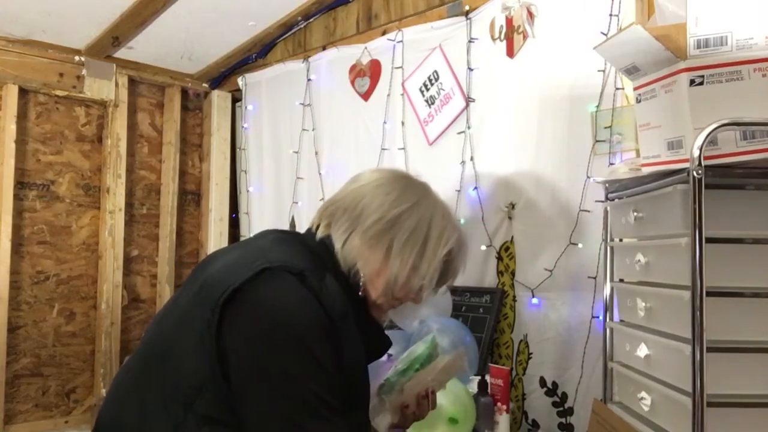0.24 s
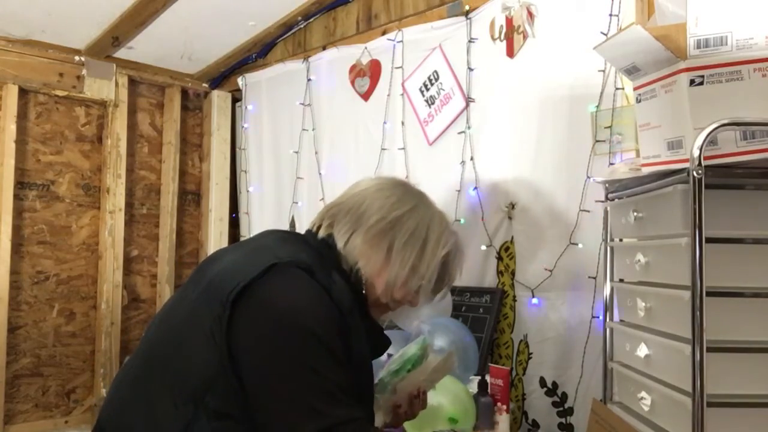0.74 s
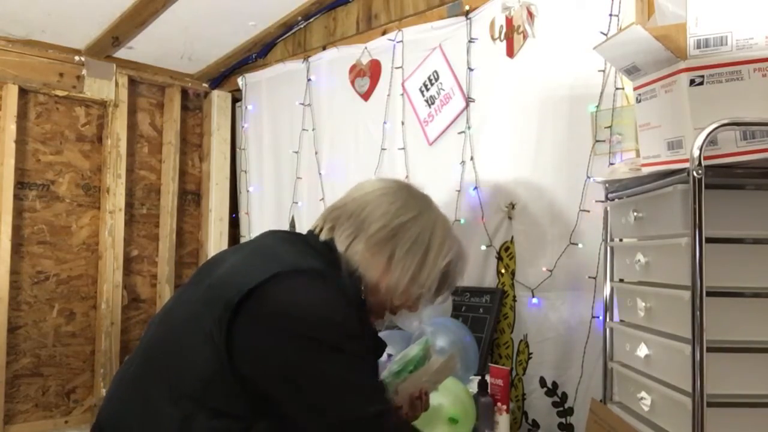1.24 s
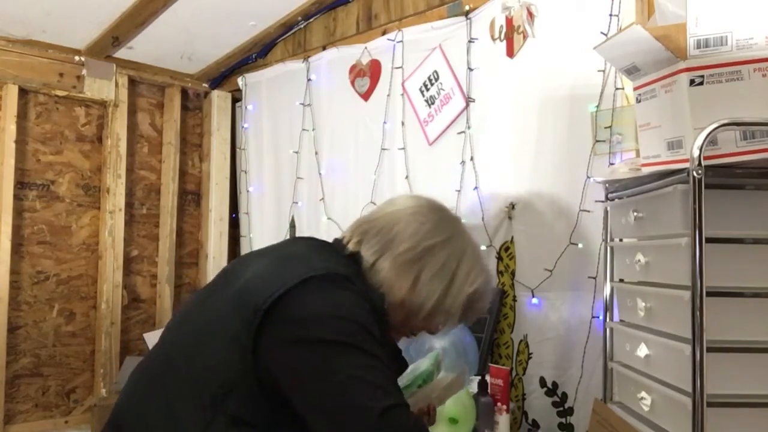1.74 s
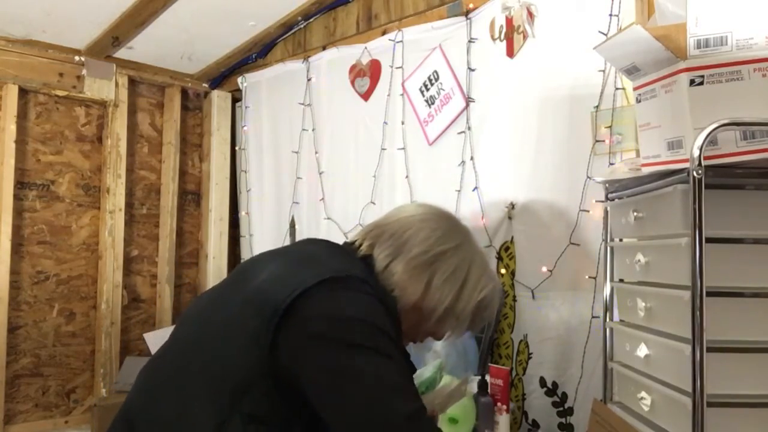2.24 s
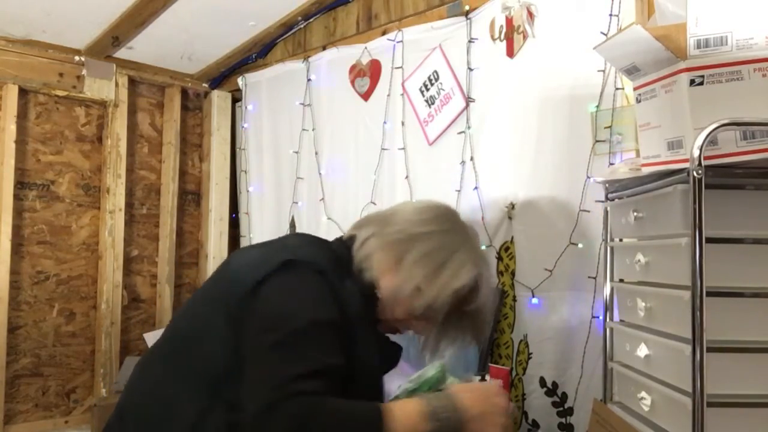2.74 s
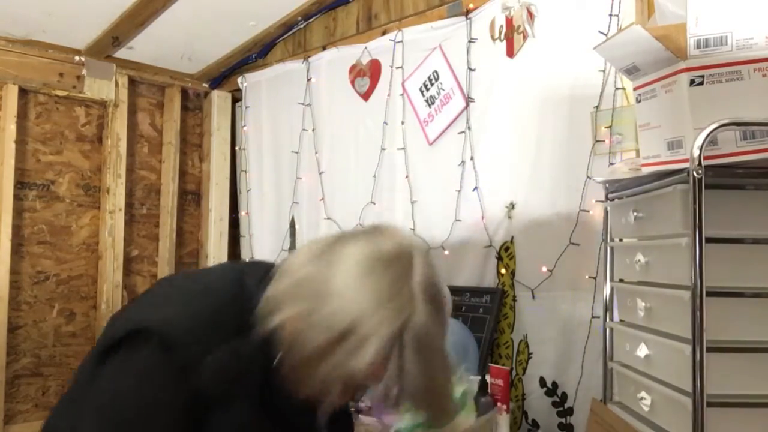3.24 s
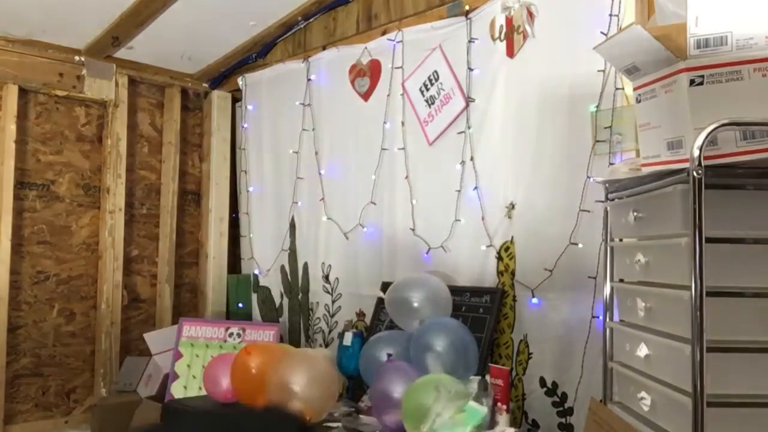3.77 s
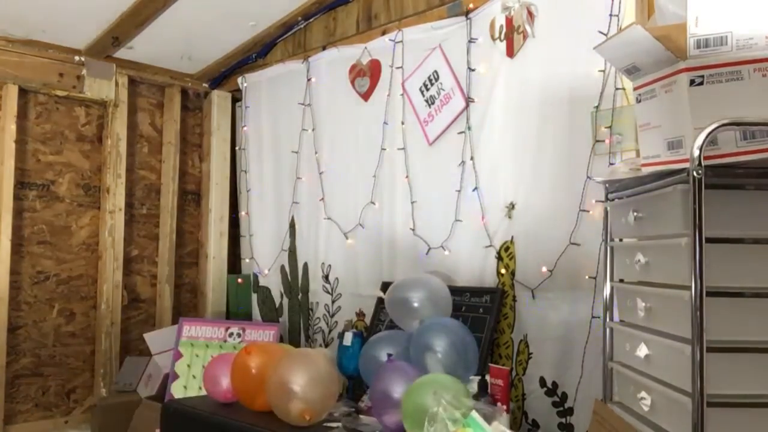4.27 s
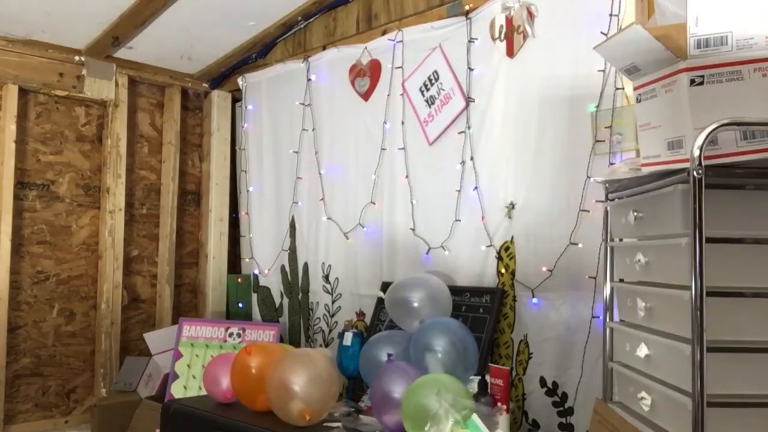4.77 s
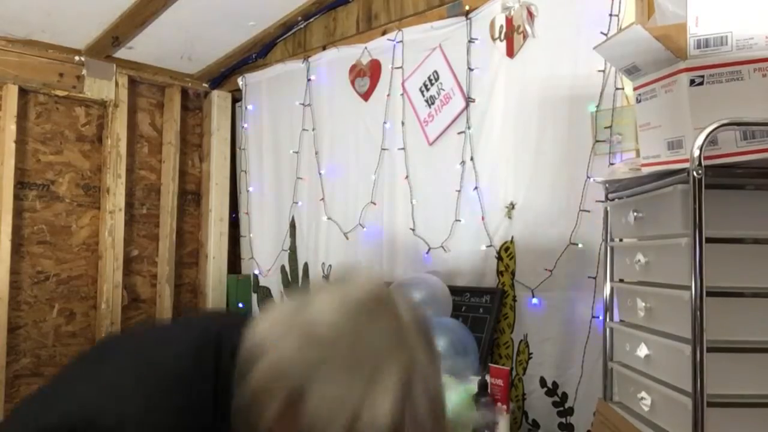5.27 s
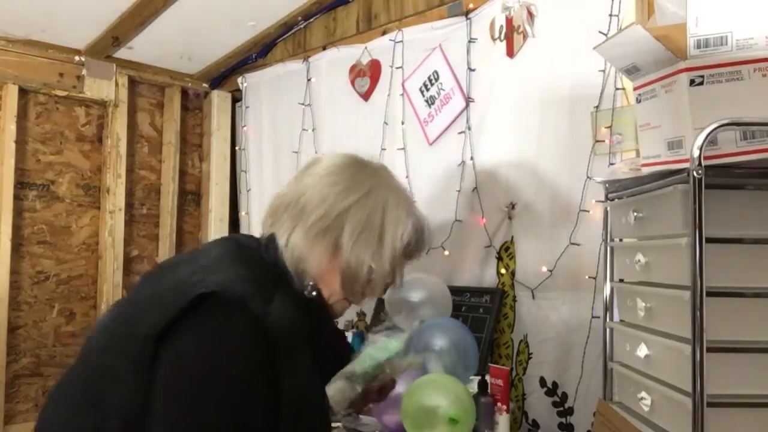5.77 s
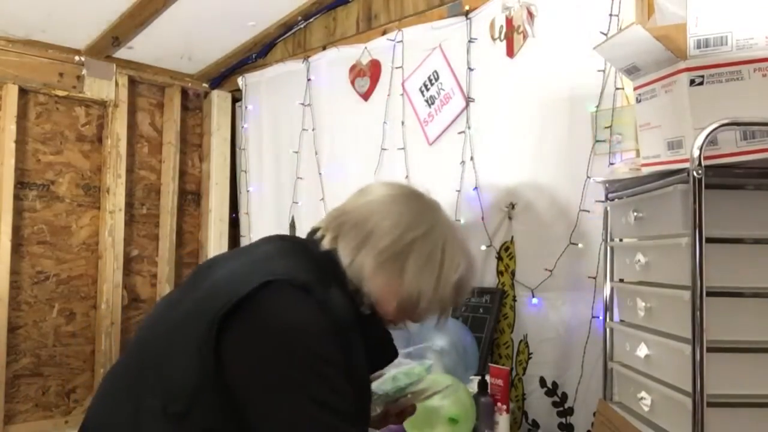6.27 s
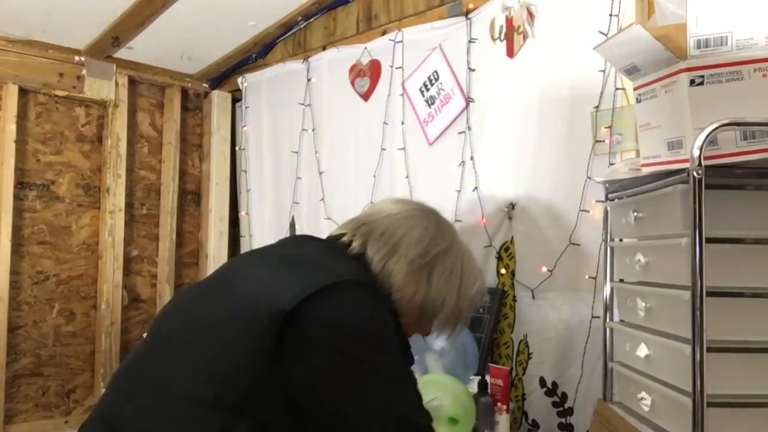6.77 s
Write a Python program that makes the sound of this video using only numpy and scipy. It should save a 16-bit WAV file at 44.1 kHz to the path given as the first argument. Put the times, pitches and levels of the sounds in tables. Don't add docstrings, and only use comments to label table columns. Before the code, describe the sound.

Hands rummage through thin plastic bags filled with small hard trinkets. Crisp crackles come in uneven bursts, densest around two seconds and again just after six, with a very sharp snap near 2.6. Pieces click and slump inside, while bags and boxes thump and pat a hollow table. A small wooden shed adds a short tail; the nearby microphone sounds bright and treble-heavy.

```python
import sys
import numpy as np
from scipy import signal
from scipy.fft import rfft, irfft
from scipy.io import wavfile

SR = 44100
rng = np.random.default_rng(int(sys.argv[2]) if len(sys.argv) > 2 else 0)


def store_wav(level_fs):
    pcm = np.round(np.clip(np.atleast_2d(level_fs), -1, 1) * 32767)
    wavfile.write(sys.argv[1], SR, pcm.T.astype(np.int16))


def boost(x):
    u = np.asarray(x, float) / 20
    return 10 ** u


N = 309141

# start in seconds, closing time in seconds, holding time in seconds, film crackle in dB.
GRABS = [(0.0, 0.0039, 0.019, -52), (0.17, 0.073, 0.036, -43.5), (0.29, 0.063, 0.009, -37.5),
         (0.753, 0.007, 0.019, -49.5), (1.211, 0.0483, 0.186, -42), (1.44, 0.0784, 0.0622, -35),
         (1.62, 0.038, 0.053, -42), (1.76, 0.108, 0.21, -46.5), (1.95, 0.082, 0.1, -41),
         (2.14, 0.0367, 0.0113, -34), (2.22, 0.072, 0.072, -38), (3.25, 0.011, 0.13, -60),
         (2.618, 0.023, 0.013, -36), (2.838, 0.0044, 0.0904, -39.5), (3.049, 0.057, 0.012, -39),
         (3.43, 0.1134, 0.65, -55), (3.86, 0.031, 0.186, -47), (4.049, 0.026, 0.22, -47),
         (4.265, 0.0452, 0.164, -40), (4.432, 0.0505, 0.046, -41), (4.56, 0.0286, 0.091, -46.5),
         (4.64, 0.133, 0.064, -46.5), (4.87, 0.0095, 0.36, -54), (5.463, 0.023, 0.039, -38.5),
         (5.629, 0.016, 0.128, -49), (5.862, 0.046, 0.23, -40), (5.97, 0.0216, .4, -38),
         (6.338, 0.0128, 0.134, -44.5), (6.753, 0.0054, 0.0582, -38.5), (6.85, 0.039, .2, -38),
         (0.42, 0.018, 0.036, -77), (0.56, .03, 0.14, -65), (0.9, 0.024, 0.0254, -60),
         (1.08, 0.059, .08, -73), (2.47, 0.0095, 0.097, -51.5), (5.2, 0.058, 0.153, -61.5),
         (6.04, 0.014, 0.0088, -50), (6.15, 0.016, 0.043, -37), (6.238, 0.025, 0.027, -31),
         (6.4, 0.0081, 0.064, -38), (6.52, 0.025, 0.021, -51), (3.98, 0.068, 0.067, -47.5)]
# time in seconds, change of rumble in dB.
LEAN = [(0, 5.5), (.45, 1.5), (.9, 3.5), (1.3, 7), (1.6, 8.5), (2.0, 5), (2.35, -3), (2.7, 2.5),
        (3.35, 5.5), (3.66, 6.5), (3.76, 16.5), (4.3, 6.5), (4.5, -3.5), (4.62, -5.5), (4.85, 1), (5.25, 6),
        (5.9, -0.5), (6.45, -1.5), (6.7, 5.5)]
# time in
# seconds, peak in dB.
SNAPS = [(0.0186, -23.2), (0.0363, -23.1), (0.099, -13.3), (0.1199, -19.9), (0.1786, -20.0),
         (0.1842, -15.8), (0.2091, -19.3), (0.249, -8.2), (0.2541, -9.5), (0.5001, -18.5), (0.5054, -22.2),
         (1.3106, -11.8), (1.3205, -11.6), (1.5026, -12.8), (1.5256, -12.7), (1.5466, -10.5),
         (1.5514, -11.4), (1.5745, -12.8), (1.6244, -14.6), (1.8289, -14.9), (1.8845, -14.3),
         (1.8896, -15.9), (1.9333, -10.5), (1.9392, -16.0), (2.0284, -13.5), (2.0455, -9.8),
         (2.0518, -12.5), (2.0577, -14.4), (2.1187, -12.0), (2.1241, -16.3), (2.1718, -13.4),
         (2.1818, -11.2), (2.1873, -13.1), (2.2173, -11.0), (2.2482, -15.0), (2.2946, -14.7),
         (2.3221, -10.1), (2.3293, -15.0), (2.3602, -13.0), (2.3651, -4.0), (2.3809, -15.6),
         (2.3858, -14.3), (2.4032, -12.2), (2.4544, -16.8), (2.4598, -15.7), (2.6117, -8.0), (2.6181, -1.2),
         (2.6218, -6.0), (2.8384, -20.5), (2.8412, -9.1), (2.8474, -11.4), (2.8536, -11.6), (3.5523, -23.3),
         (3.7495, -21.7), (3.8258, -23.7), (3.8401, -22.4), (3.8721, -22.8), (3.8792, -22.1),
         (3.8924, -17.6),
         (4.1978, -18.1), (4.4565, -12.1), (4.4611, -12.6), (4.6184, -15.1), (4.6266, -14.5),
         (4.7331, -14.8), (4.895, -16.5), (5.0975, -24.2), (5.1467, -26.6), (5.4715, -7.8), (5.4772, -17.2),
         (5.4917, -14.6), (5.5432, -14.9), (5.5501, -13.2), (5.6848, -14.5), (5.6919, -11.8),
         (5.6973, -11.9), (5.867, -18.1), (5.9215, -8.4), (5.9269, -11.5), (5.9906, -14.9), (6.0032, -11.4),
         (6.0645, -10.8), (6.0698, -8.1), (6.0723, -12.0), (6.09, -5.2), (6.0953, -9.3), (6.1168, -12.5),
         (6.1284, -12.4), (6.1632, -7.3), (6.1684, -9.4), (6.1745, -9.7), (6.1836, -12.2), (6.2063, -9.9),
         (6.2113, -9.1), (6.2152, -12.4), (6.2398, -8.7), (6.2449, -11.5), (6.2531, -11.5), (6.2584, -10.1),
         (6.2758, -8.6), (6.281, -9.2), (6.2843, -8.9), (6.2897, -9.4), (6.2937, -11.5), (6.3834, -12.8),
         (6.3887, -13.7), (6.4092, -13.6), (6.4446, -12.9), (6.574, -20.8), (6.7621, -16.7),
         (6.7663, -14.3), (6.7741, -13.3), (6.8042, -13.8), (6.9195, -10.8), (6.9639, -15.8),
         (6.9731, -11.9), (7.0012, -11.8), (7.0069, -12.9),
         (0.0401, -23.7), (0.0939, -24.3), (0.1135, -20.7), (0.2158, -21.9), (0.2236, -23.8),
            (0.5557, -28.2), (0.5612, -34.0), (0.6463, -40.7), (0.803, -22.8), (0.8964, -26.5),
            (1.1674, -42.7), (1.8246, -23.0), (1.875, -18.8), (1.9779, -18.6), (2.0128, -17.4),
            (2.317, -16.3), (2.3396, -16.0), (2.5528, -24.6), (2.5782, -25.8), (3.4936, -29.9),
            (3.586, -27.3), (3.8793, -21.6), (3.9571, -21.1), (3.9663, -20.8), (4.2301, -18.5),
            (4.2956, -19.6), (4.3959, -17.6), (4.5691, -19.0), (4.6116, -18.6), (4.6729, -18.2),
            (4.7192, -18.5), (4.8889, -20.9), (4.9772, -30.1), (5.2913, -34.4), (5.5243, -15.9),
            (5.5707, -15.1), (5.702, -16.2), (5.785, -23.7), (5.8618, -25.6), (6.0766, -13.8),
            (6.5489, -23.6), (6.5539, -25.0), (6.5688, -21.6), (6.5895, -22.5), (6.6036, -21.8),
            (6.6091, -24.1), (6.7978, -15.3), (6.8432, -18.4)]
# time in seconds, peak in dB, rattle centre in Hz, rattle treble in dB re peak.
KNOCKS = [(0.071, -41, 1100, 6.5), (0.0986, -56.5, 5060, 32.5), (0.177, -38, 2850, 18),
          (0.232, -43, 5150, 24), (0.2887, -31, 5790, 11.5), (0.5, -55.5, 5760, 26.5),
          (0.764, -51.5, 2780, 22), (1.216, -32, 810, 4.5), (1.343, -21.5, 1000, 3.5),
          (1.8223, -40.5, 5970, 9), (2.0474, -31.5, 3000, 16), (2.058, -28.5, 1166, -10),
          (2.17, -16.5, 2610, -4), (2.359, -56.5, 5700, 14), (2.6105, -23, 2800, 18.5),
          (2.616, -17, 2900, 7.5), (2.7165, -28.5, 5300, -1.5), (2.846, -30.5, 2370, 18),
          (2.8947, -21.5, 5480, 5.5), (2.9713, -31.5, 2200, -14), (3.414, -36.5, 1820, 4.5),
          (3.8923, -20, 1850, -15), (4.19, -32, 4500, 12.5), (4.159, -31.5, 4000, -5),
          (4.887, -40.5, 1780, 11), (5.1067, -40.5, 1990, 2), (5.4726, -31.5, 4520, 9.5),
          (5.547, -27, 3500, 12.5), (5.685, -28.5, 3120, 12.5), (5.862, -41.5, 2300, 14.5),
          (5.9192, -34, 2870, 1), (6.764, -31, 3570, 14), (3.966, -30, 735, -35.5),
          (6.408, -30.5, 4000, 10)]
# time in seconds, peak in dB, rattle centre in Hz, rattle treble in dB re peak.
SLUMPS = [(0.1044, -39.5, 4920, 9), (0.3494, -51.5, 2820, 4), (0.8644, -52, 3100, 21.5),
          (0.895, -52, 3180, 23.5), (1.2844, -41, 4360, 23.5), (1.3125, -24, 4900, 8.5),
          (1.3994, -32.5, 1770, 10.5), (1.5199, -39, 4990, 1), (1.6194, -34.5, 1020, 15),
          (1.8714, -31, 5470, 11.5), (1.9744, -35.5, 3160, 15.5), (2.8444, -34, 2500, -1),
          (2.954, -29.5, 2680, 6.5), (3.047, -30, 1210, 7.5), (3.0974, -24, 2790, 8.5),
          (3.196, -30.5, 2490, 10), (3.4244, -31.5, 1550, -7), (3.925, -26.5, 1110, -5),
          (4.0774, -25.5, 5600, 7.5), (4.3344, -29, 4340, 4.5), (4.4504, -23, 2870, 9),
          (4.5044, -28.5, 6050, -38.5), (4.606, -46.5, 4960, 30), (4.666, -34.5, 6800, 18),
          (4.713, -29.5, 4010, 14), (5.497, -29.5, 4400, -6), (5.6421, -29, 5200, 2.5),
          (6.0544, -26.5, 6100, -10), (6.263, -40, 5200, 10), (6.575, -31, 4010, 4),
          (3.465, -39.5, 1000, 1), (3.96, -30, 800, -20), (4.1, -39, 1920, -6), (4.09, -32.5, 980, -8.5),
          (6.87, -29, 1300, -1.5), (2.67, -29, 2760, -4), (4.41, -41.5, 5000, 21), (6.198, -38, 5000, 22),
          (6.375, -46.5, 5000, 9.5), (1.6, -35.5, 5000, 15), (4.79, -47, 5000, 24), (2.92, -38, 5500, 6),
          (5.99, -33, 3500, 3)]
# frequency in Hz, level in dB, T60 in seconds.
PIECE_MODES = [(724, -7.5, 0.16), (1120, -9, 0.05), (1420, -5, 0.07), (1620, -4, 0.04), (1850, -8, .04),
               (2270, -24, 0.071), (2420, 3, 0.035), (2876, 0, 0.03), (3180, 4, 0.06), (4560, -9, 0.046),
               (5150, 1, 0.03), (5950, -5, 0.04)]
# time in seconds, peak in dB, then middle modes, upper modes and floor boom in dB re peak.
THUMPS = [(0.155, -70, 12, 22, -20), (0.24, -68, 16.5, 10, -12), (0.765, -66, 8, 8, -20),
          (1.211, -50, 12, 21, -24), (1.2172, -20, -13, -22, -34), (1.2466, -28, -22, -30, -40),
          (1.338, -28, -7, -10, -26), (1.375, -32, -10, -20, -26), (1.44, -52, 8, -5, -20),
          (1.635, -56, 14, -5, -20), (2.167, -34, 0, 0, -21), (2.418, -50, 7, 5, -14),
          (2.615, -34, -15, -20, -14), (2.91, -42, -12, -16, 7), (3.143, -37, -29, -29, 0),
          (3.229, -62.5, -14, -14, 29), (3.425, -66, 25, 22, -20), (3.438, -74, 36, 39, -22),
          (3.47, -70, 28, 22, -20), (3.597, -56, 10, 8, -30), (3.703, -52, 5, -10, -11),
          (3.902, -31, -14, -20, -26), (4.028, -36, -4, -14, -26), (4.085, -55, 14, 5, -20),
          (4.253, -44, -9, -9, -14), (4.33, -48, -10, -20, -14), (4.468, -45, -24, -24, -1),
          (5.477, -46.5, -5, -5, -26), (5.56, -49, -15, -15, -20), (5.878, -53.5, -2, -2, 10),
          (5.994, -42.5, -5, -5, -22), (6.305, -32, -8, -20, -16), (6.342, -35, -12, -25, -16),
          (6.436, -31, -4, -16, 2), (6.447, -33, -15, -15, 11.5), (6.471, -51, -14, -14, 24),
          (6.598, -56, -12, -16, 19), (6.764, -50, 13, 6, -18), (6.774, -33, 0, -14, -18),
          (6.888, -38, -20, -25, -30)]
# frequency in Hz, level in dB, T60 in seconds.
TABLE_LOW = [(136, 0, 0.22), (195, -13, 0.3), (250, -12, 0.12)]
# frequency in Hz, level in dB, T60 in seconds.
TABLE_MIDDLE = [(317, -1, 0.096), (372, 2.5, 0.13), (413, 3.5, 0.07)]
# frequency in Hz, level in dB, T60 in seconds.
TABLE_UPPER = [(481, -35.5, 0.044), (628.6, -0.5, 0.075), (770, -1.5, 0.11), (1000, 2, 0.08)]
# frequency in Hz, level in dB, T60 in seconds.
FLOOR_BOOM = [(49, 0, .24), (78, 0, .18)]
# time in seconds, peak in dB, frequency in Hz.
PATS = [(1.255, -32, 228), (1.357, -43, 77), (1.367, -42, 226), (1.378, -41.5, 87), (1.386, -37, 230),
        (1.388, -41, 390), (1.442, -43, 350), (2.177, -42, 365), (2.212, -43, 129.6), (2.62, -39.5, 201),
        (2.632, -42.5, 132.5), (3.138, -45, 240.5), (3.21, -45, 216), (3.231, -50.5, 66.7),
        (3.71, -45, 237), (3.733, -48, 237.4), (3.906, -47.5, 372), (3.951, -41, 364.7), (3.985, -55, 135),
        (4.032, -46, 342.5), (4.032, -42, 225), (4.113, -41, 257), (6.291, -39, 379), (6.316, -43, 337),
        (6.316, -40, 231), (6.391, -40, 127), (6.425, -41.5, 127), (6.448, -34, 215), (6.45, -35.5, 80.6),
        (6.464, -42, 340), (6.477, -39.5, 212), (6.489, -41, 145), (6.514, -46, 58.3), (6.522, -45, 198.6),
        (6.553, -48.5, 65), (6.786, -36.5, 144.2), (6.795, -47.5, 75), (6.855, -40.5, 372),
        (6.875, -44, 235), (6.879, -42.5, 389), (6.928, -46, 133), (6.945, -45, 384)]
# time in seconds, level in dB, frequency in Hz, T60 in seconds.
SQUEAK = [
    (1.883, -30, 9950, .04),
]
# time in seconds, frequency in Hz, level in dB.
SLIDE = [
    (3.72, 173.9, -55),
    (3.76, 173.8, -43.5),
    (3.802, 186.6, -64),
    (3.86, 188.2, -56.5),
    (3.91, 199.8, -47),
    (3.97, 211.1, -48),
    (4.03, 189.7, -53),
]
# frequency in Hz, level in dB per Hz.
TREBLE_COLOUR = [(3000, -45), (5000, -17), (7600, -15), (8800, -5), (10100, -6), (11000, 1), (11800, 0),
                 (13500, -9), (14600, -16), (16000, -24)]
# frequency in Hz, level in dB per Hz.
BODY_COLOUR = [(290, -13.5), (500, -6.5), (602, -6.5), (823, -4.5), (1790, -1), (2310, -0.5), (4690, -4),
               (8000, -14.5), (10400, -15), (17600, -120)]
# frequency in Hz, level in dB per Hz.
RUMBLE_COLOUR = [(15, -71), (25, -46.5), (75, -9), (96, -11.5), (117, -9.5), (135, 4.5), (156, -1),
                 (200, -1), (280, -3.5), (330, -2), (370, 0), (420, -6), (520, -8.5), (900, -15.5),
                 (1980, -55.5)]
# frequency in Hz, level in dB per Hz.
AIR_COLOUR = [(25, -26.5), (60, 19), (138, 14.5), (368, -47), (520, -11), (1100, 8.5), (7100, -20.5),
              (11300, 1.5), (14600, -40), (16000, -29)]

CLOSING_DB, RELEASE_DB_PER_S, REST_DB = 19, 131.5, -78
SETTLE_DB, SETTLE_DB_PER_S = -26, 36.5
BODY_DB, BODY_PER_DB = -2, -0.1971
RUB_DB, RUB_PER_DB = -62.5, 0.59
WAKE_DB, WAKE_DB_PER_S = -14, 168
STRAYS_PER_S, STRAY_DB, STRAY_SPREAD_DB = 3, 4, 3
KNOCK_RISE_S, KNOCK_T60_S = .0025, 0.13
SLUMP_RISE_S, SLUMP_T60_S = .014, 0.13
PAT_RISE_CYCLES, PAT_T60_CYCLES = 1.5, 14
SHED_T60_S, SHED_DB = 0.22, -11.5
AIR_DB = -68.5
CUTOFF_HZ, BASS_CUT_HZ = 16050, 44


def rms_one(x):
    return x / np.sqrt(np.mean(x ** 2) + 1e-20)


def in_time(rows):
    s, *columns = np.transpose(rows)
    return [np.interp(np.arange(N) / SR, s, c) for c in columns]


def colour(x, spectrum):
    size = 8192
    hz = np.maximum(np.arange(size // 2 + 1) * SR / size, 1)
    point_hz, point_db = np.transpose(spectrum)
    gain_db = np.interp(np.log(hz), np.log(point_hz), point_db)
    cepstrum = irfft(np.log(boost(gain_db)))
    cepstrum[1:size // 2] *= 2
    cepstrum[size // 2 + 1:] = 0
    pulse = irfft(np.exp(rfft(cepstrum)))
    return signal.fftconvolve(x, pulse / np.sqrt(np.sum(pulse ** 2)))[:N]


def drift(rate):
    r = np.exp(-80 * np.pi * rate / SR)
    noise = rng.standard_normal(N // 40 + 2002)
    slow = signal.lfilter([1], [1, -2 * r, r * r], noise)[2000:]
    return np.interp(np.arange(N) / 40, np.arange(len(slow)), rms_one(slow))


def ring(clicks, hz, t60):
    r, w = boost(-60 / (t60 * SR)), 2 * np.pi * hz / SR
    return signal.lfilter([0, np.sin(w)], [1, -2 * r * np.cos(w), r * r], clicks + 1e-18)


def clicks_at(s, db):
    out = np.zeros(N)
    index = np.round(np.asarray(s) * SR).astype(int)
    out[np.minimum(index, N - 1)] = boost(db)
    return out


def creases(per_s, spread_db, length_s):
    clumping = boost(4.0 * np.minimum(drift(25), 1))
    born = rng.random(N) < per_s * clumping / SR
    sizes = boost(spread_db * np.minimum(rng.exponential(1, N), 2.8))
    r = np.exp(-1 / (length_s * SR))
    region = rng.integers(0, 6, N)
    out = np.zeros(N)
    for k, hz in enumerate(np.geomspace(1500, 13000, 6)):
        bursts = signal.lfilter([1], [1, -r], born * sizes * (region == k) + 1e-18)
        puffs = bursts * rng.standard_normal(N)
        band = signal.butter(1, [hz / 2.07, hz * 1.64], "band", fs=SR)
        out += .5 * puffs + signal.lfilter(*band, puffs)
    return rms_one(out)


def fading(rise_db):
    total_db = 10 * np.log10(np.sum(boost(rise_db) ** 2, axis=0) + 1e-20)
    return np.interp(np.arange(N) / SR, np.arange(len(total_db)) / 1000, total_db)


def hand():
    t = np.arange(N * 1000 // SR + 2) / 1000
    s, closing, holding, level_db = np.transpose(GRABS)[:, :, None]
    closing = np.maximum(closing, .005)
    since_release = t - s - closing - holding
    swell_db = -CLOSING_DB * np.maximum(1 - (t - s) / closing, 0)
    grabs = level_db + swell_db - RELEASE_DB_PER_S * np.maximum(since_release, 0)
    creep_db = level_db + SETTLE_DB - SETTLE_DB_PER_S * since_release
    creep = np.where(t > s + closing, creep_db, -200)
    crackle_db = fading(np.vstack([grabs, creep, REST_DB + 0 * t]))

    s, peak_db, middle_db = np.transpose(THUMPS)[:3, :, None]
    wake = peak_db + np.maximum(middle_db, -9) + WAKE_DB - WAKE_DB_PER_S * (t - s)
    wake_db = fading(np.where(t > s, wake, -200))

    effort_db = crackle_db + 45
    body_db = BODY_DB + BODY_PER_DB * effort_db
    rub_db = RUB_DB + RUB_PER_DB * effort_db + in_time(LEAN)[0]
    rumble_db = 10 * np.log10(boost(rub_db) ** 2 + boost(wake_db) ** 2)
    return crackle_db, body_db, rumble_db


def film(crackle_db, body_db):
    fine = creases(1800, spread_db=2.0, length_s=0.0003)
    rub = rng.standard_normal(N) * boost(1.3 * drift(25))
    treble = boost(crackle_db + 1.0) * (.7 * fine + .7 * rub)
    body = boost(crackle_db + body_db - 4.5) * (.35 * fine + .6 * rub)
    return treble, body


def table_rumble(rumble_db):
    return boost(rumble_db + 1.5 * drift(12)) * colour(rng.standard_normal(N), RUMBLE_COLOUR)


def room_air():
    return boost(AIR_DB) * colour(rng.standard_normal(N), AIR_COLOUR)


def snaps(crackle_db):
    s, peak_db = np.transpose(np.array(SNAPS))
    stray_db = crackle_db + STRAY_DB + STRAY_SPREAD_DB * rng.uniform(-1, 1, N)
    strays = (rng.random(N) < STRAYS_PER_S / SR) * boost(stray_db)
    clicks = clicks_at(s, peak_db - .8) + strays
    r = np.exp(-1 / (.0012 * SR))
    puffs = signal.lfilter([0, 1], [1, -r], clicks) * rng.standard_normal(N)
    treble = clicks + .14 * puffs
    return treble, boost(-28.5) * treble


def rattles(events, rise, t60, hard):
    treble, body, pieces = np.zeros((3, N))
    t = np.arange(int(.3 * SR)) / SR
    grains = 0.45 * creases(3000, spread_db=1.5, length_s=0.00025) + 0.5 * rng.standard_normal(N)
    swell = np.minimum(t / rise, 1) * boost(-60 * np.maximum(t - rise, 0) / t60)
    for s, peak_db, hz, treble_db in events:
        i = round(s * SR)
        n = min(len(t), N - i)
        dying = swell[:n] * grains[i:i + n]
        broad = signal.butter(2, [hz / 1.49, hz * 1.3], "band", fs=SR, output="sos")
        stopping = dying * swell[:n] ** hard
        pieces[i:i + n] += boost(peak_db - 2.5) * signal.sosfilt(broad, stopping)
        body[i:i + n] += boost(peak_db - 17.5 + 0.27 * treble_db) * dying
        treble[i:i + n] += boost(peak_db + treble_db - 11.5) * dying
    return np.array([treble, body, pieces])


def knocks():
    knocking = rattles(KNOCKS, KNOCK_RISE_S, KNOCK_T60_S, hard=0.73)
    slumping = rattles(SLUMPS, SLUMP_RISE_S, SLUMP_T60_S, hard=0)
    treble, body, pieces = knocking + slumping
    s, peak_db, centre_hz = np.transpose(KNOCKS)[:3]
    chance_db = rng.normal(0, 2.9, (len(s), len(PIECE_MODES)))
    for k, (hz, level_db, t60) in enumerate(PIECE_MODES):
        far_db = -8 * np.abs(np.log2(centre_hz / hz))
        strike_db = peak_db + level_db + far_db - 13.5 + chance_db[:, k]
        pieces += ring(clicks_at(s, strike_db), hz, t60)
    return treble, body, pieces


def thumps():
    s, peak_db, middle_db, upper_db, boom_db = np.transpose(THUMPS)
    out = np.zeros(N)
    r, uneven = np.exp(-1 / (.012 * SR)), rng.standard_normal(N)
    # modes, their share in dB, push in seconds, strength of the after-contacts
    groups = ((TABLE_LOW, -6, .006, .008),
              (TABLE_MIDDLE, middle_db - 5, .003, .04),
              (TABLE_UPPER, upper_db - 5, .0015, .04),
              (FLOOR_BOOM, boom_db - 16, .008, .02))
    for modes, share_db, push_s, chatter in groups:
        chance_db = rng.normal(0, 1.5, (len(s), len(modes)))
        rung = np.zeros(N)
        for k, (hz, level_db, t60) in enumerate(modes):
            blows = clicks_at(s, peak_db + share_db + level_db + chance_db[:, k])
            after = uneven * signal.lfilter([1], [1, -r], blows)
            rung += ring(blows + chatter * after, hz, t60)
        push = np.hanning(round(push_s * SR))
        pushed = signal.oaconvolve(rung, push / push.sum())[:N]
        radiates = signal.butter(3, .7 * modes[0][0], "high", fs=SR, output="sos")
        out += signal.sosfilt(radiates, pushed)
    return out


def pats():
    out, t = np.zeros(N), np.arange(N) / SR
    for s, peak_db, hz in PATS:
        near = slice(round((s - 2 / hz) * SR), round((s + 16 / hz) * SR))
        cycles = (t[near] - s) * hz
        swell = np.sin(np.pi / 2 * np.clip(1 + cycles / PAT_RISE_CYCLES, 0, 1)) ** 2
        dying = boost(peak_db - 60 * np.maximum(cycles, 0) / PAT_T60_CYCLES)
        out[near] += swell * dying * np.cos(2 * np.pi * cycles)
    return out


def squeak():
    s, level_db, hz, t60 = SQUEAK[0]
    slips = clicks_at([s, s + .006, s + .025], [level_db, level_db, level_db - 4])
    return ring(slips, hz, t60)


def slide():
    hz, level_db = in_time(SLIDE)
    t = np.arange(N) / SR
    moving = np.clip(np.minimum(t - SLIDE[0][0], SLIDE[-1][0] - t) / 0.0076, 0, 1)
    phase = 2 * np.pi * np.cumsum(hz) / SR
    drone = np.sin(phase) + .25 * np.sin(2 * phase)
    return moving * boost(level_db + 1.2 * drift(20)) * drone


def shed(x):
    t = np.arange(int(.4 * SR)) / SR
    tail = rng.standard_normal(len(t)) * boost(-60 * t / SHED_T60_S) * (t > .002)
    return x + boost(SHED_DB) * signal.fftconvolve(x, tail / np.sqrt(np.sum(tail ** 2)))[:N]


def scene():
    crackle_db, body_db, rumble_db = hand()
    film_treble, film_body = film(crackle_db, body_db)
    snap_treble, snap_body = snaps(crackle_db)
    knock_treble, knock_body, pieces = knocks()
    treble = colour(film_treble + snap_treble + knock_treble, TREBLE_COLOUR)
    body = colour(film_body + snap_body + knock_body, BODY_COLOUR)
    bags = treble + body + pieces + squeak()
    table = thumps() + pats() + slide() + table_rumble(rumble_db)
    return (shed(bags) + table + room_air())[None]


def band_limit(x):
    return signal.sosfilt(signal.butter(12, 16810, fs=SR, output="sos"), x)


def record(dry):
    top_cut = signal.cheby2(20, 60, CUTOFF_HZ + 100, fs=SR, output="sos")
    bass_cut = signal.butter(6, BASS_CUT_HZ, "high", fs=SR, output="sos")
    trimmed = signal.sosfilt(top_cut, signal.sosfilt(bass_cut, dry))
    rounded = .5 * np.tanh(trimmed / .5)
    return band_limit(signal.sosfilt(top_cut, rounded))


dry = scene()
out = record(dry)
store_wav(out)
```